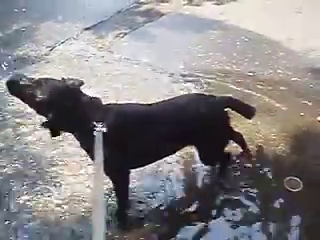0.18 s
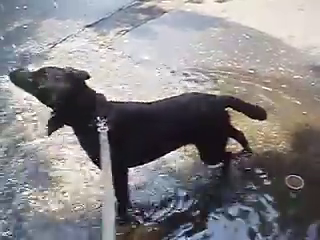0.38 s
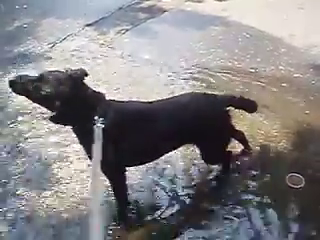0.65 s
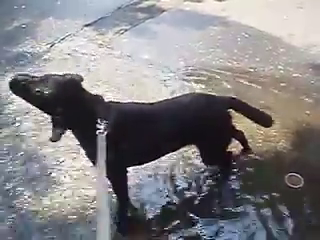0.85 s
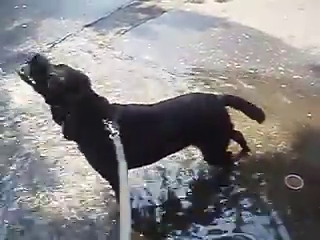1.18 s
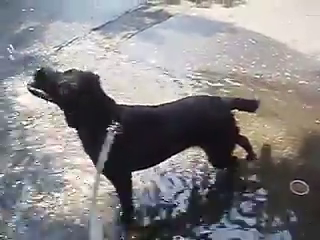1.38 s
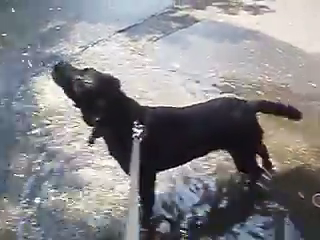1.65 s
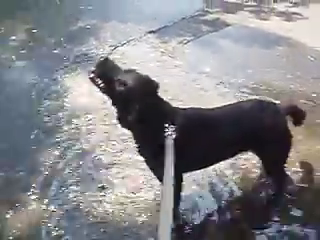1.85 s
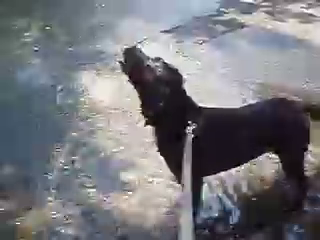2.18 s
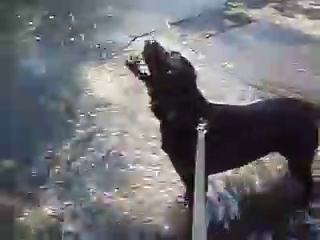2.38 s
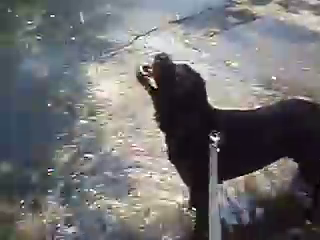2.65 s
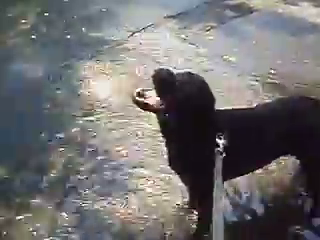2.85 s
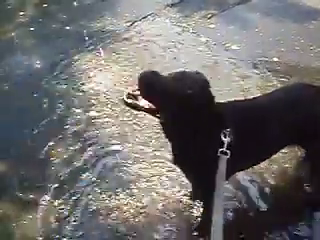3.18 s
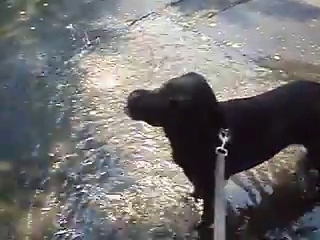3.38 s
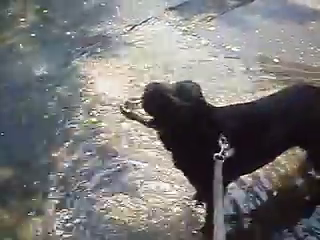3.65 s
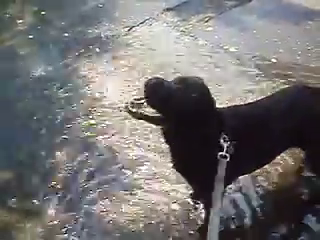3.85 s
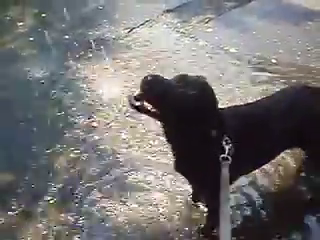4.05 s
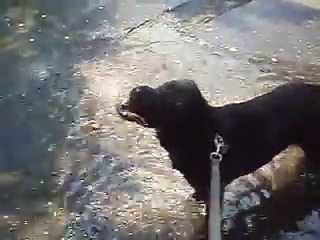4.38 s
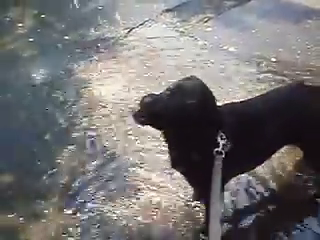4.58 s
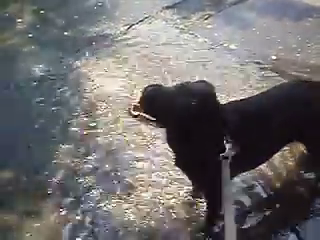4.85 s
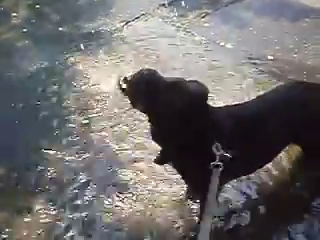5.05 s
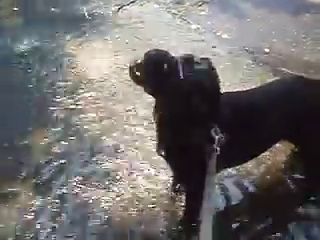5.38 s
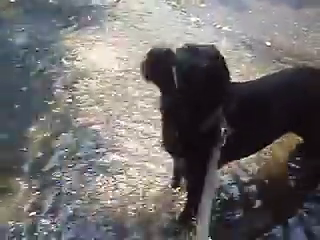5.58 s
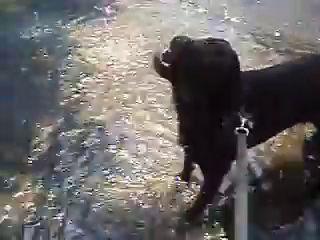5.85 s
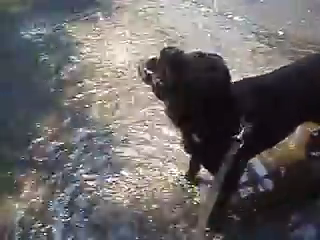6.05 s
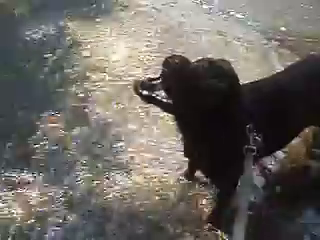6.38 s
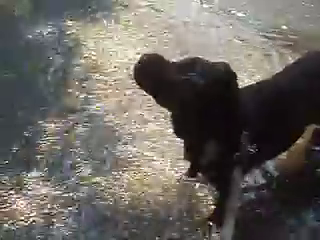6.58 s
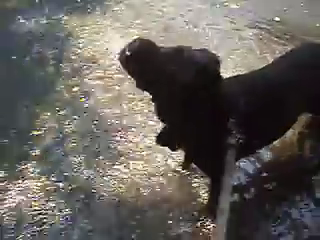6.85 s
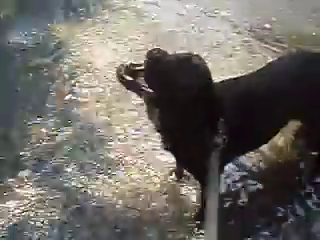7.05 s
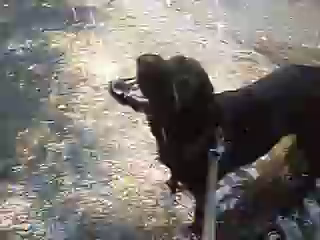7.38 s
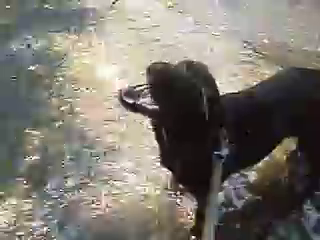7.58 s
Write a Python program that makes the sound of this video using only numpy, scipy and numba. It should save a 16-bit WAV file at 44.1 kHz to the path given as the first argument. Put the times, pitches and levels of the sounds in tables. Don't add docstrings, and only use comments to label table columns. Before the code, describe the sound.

A loud, bright hiss of spraying water fills the whole stretch, made of countless tiny splashes on a puddled pavement outdoors. Nearby drops plink sharply, some lower and rounder, others tick on stone. A low pump throbs underneath with blurred distant traffic. The spray gusts briefly after four seconds. A small camera microphone makes it narrow, dull on top and crunchy with overload.

```python
import sys
import numpy as np
from scipy import signal
from scipy.fft import rfft, irfft
from scipy.io import wavfile
from scipy.ndimage import uniform_filter1d
from numba import njit

SR = 44100
rng = np.random.default_rng(int(sys.argv[2]) if len(sys.argv) > 2 else 0)


def level_to_linear(level):
    exponent = np.asarray(level, float) / 20
    return 10 ** exponent


def persist_wave(psi):
    counts = np.round(np.clip(psi, -1, 1) * 32767).astype(np.int16)
    wavfile.write(sys.argv[1], SR, np.atleast_2d(counts).T)


N = 340452

# time_s, level_db
SPRAY_FLOW = [
    (0.0, -22),
    (0.64, -22.5),
    (1.24, -21),
    (4.0, -22.5),
    (4.28, -18.5),
    (4.86, -22),
    (5.78, -20),
    (5.98, -21.5),
    (7.72, -21.5),
]
# freq_hz, level_db (per Hz)
HISS_COLOUR = [(1000, -25), (1700, -8), (2100, -7.5), (2600, -3.5), (3050, -3.5), (3350, -0.5), (3600, -1),
               (4200, 3), (6000, 0)]
# freq_hz, level_db (per Hz)
PATTER_COLOUR = [(400, -6.5), (650, -6.5), (1000, -2), (1500, -1), (2000, -4.5), (2600, -9), (3500, -30.5)]
# peak_s, peak_db, pitch_hz, loud_part_cycles
NEAR_DROPS = [(0.2286, 0.8, 3450, 4.5), (0.67, -1.5, 3100, 2.1), (0.727, -0.5, 3030, 1.6),
              (1.3383, 0.5, 2750, 3.2), (1.5718, -2, 3190, 2.3), (1.6552, 1, 3030, 2.5),
              (1.7555, 0, 3280, 2.7), (1.8984, 1.5, 3370, 5.0), (2.2186, -0.5, 3080, 2.2),
              (2.4342, -4.5, 2820, 2.2), (2.4828, -7.5, 3510, 5.5), (2.6328, -2, 3040, 4.2),
              (2.9702, 2, 3400, 3.2), (3.1575, 0.5, 3430, 4.1), (3.2598, 0, 3230, 6.5),
              (3.5561, -2.5, 3500, 7.0), (3.79, -1, 2870, 2.7), (4.1397, 2, 3140, 2),
              (4.6667, -10, 3270, 6.4), (5.1663, 0, 3170, 2.6), (5.2042, 0, 3180, 1.9),
              (5.2507, 2.5, 3350, 2.2), (5.264, -1.5, 3220, 5.6), (5.943, 5.2, 3000, 1.7),
              (6.0117, 0.5, 2750, 2.9), (6.5294, 0.5, 2950, 2.9), (6.8639, 0.5, 3230, 4.9),
              (7.2348, -3, 3100, 2.8), (7.2713, 1.5, 3340, 7.2), (7.5009, -6.5, 3500, 4.9)]
# peak_s, peak_db, pitch_hz, loud_part_cycles
LOW_PLINKS = [(0.2041, -13.5, 1185, 7.1), (0.6832, -8.5, 1600, 2.1), (0.936, -15, 1303, 3.5),
              (1.4266, -13, 1500, 2.2), (2.0641, -17, 1610, 2.2), (2.3114, -12.5, 1590, 3.8),
              (2.354, -6, 1130, 4.4), (3.0429, -9, 1475, 1.9), (3.1183, -10, 1820, 3.8),
              (3.3947, -14, 1940, 7.3), (3.6193, -12, 1410, 1.7), (4.4656, -12.5, 1464, 4.6),
              (4.4923, -9, 1330, 1.9), (4.6677, -16, 1730, 6.7), (5.5377, -14, 1620, 2.5),
              (5.7594, -7.5, 1324, 1.5), (6.2225, -8, 1586, 3), (6.461, -10.5, 1260, 2.4),
              (6.8825, -6.5, 1124, 1.5), (7.5266, -10.5, 1820, 4.5), (7.6699, -9, 1900, 3.2)]
# pitch_hz, mean_level_db, load_share (of the load's swing)
PUMP_PARTIALS = [(69.86, -21.5, -0.22), (113.8, -26, 0.26), (172.2, -25.5, 0.16), (217, -25.5, 0.91)]
# time_s, level_db
PUMP_LOAD = [(0, 4.5), (.6, 2), (1.0, -4.5), (1.6, -8), (2.6, -0.5), (3.9, 0.5), (4.4, -6.5), (4.7, 5),
             (6.0, 4), (6.9, 6), (7.3, -1), (7.72, -11)]
# pitch_hz, width_hz, level_db
WHINE_TONES = [(156.0, 7.0, -26), (1191, 3.0, -45), (1950, 4.0, -44)]
# time_s, level_db
TRAFFIC_SWELL = [(0.0, -22), (0.23, -21.5), (0.56, -22.5), (0.73, -22), (1.78, -21), (2.49, -22.5),
                 (2.79, -22), (3.07, -22), (3.46, -22), (3.67, -22.5), (4.43, -21.5), (4.75, -21.5),
                 (5.65, -21), (5.83, -22), (6.26, -22.5), (6.66, -21.5), (6.94, -24), (7.72, -20)]
# freq_hz, level_db (per Hz)
RUMBLE_COLOUR = [(20, -24), (40, -8.5), (70, -3), (120, -3.5), (220, -4), (320, -8.5), (500, -14),
                 (800, -19.5), (1500, -27.5)]
# freq_hz, gain_db
BAND_EDGE = [(10, 1), (3650, -1), (3880, -5.5), (4090, -13), (4300, -23.5), (4500, -35.5), (4650, -62.5),
             (5000, -95)]

PATTER_DB, PATTER_FOLLOWS = -25, 0.68
SPLAT_PER_S, SPLAT_DB, SPLAT_SPREAD_DB = 200, -7, 4.5
STRAY_PER_S, STRAY_DB, STRAY_SPREAD_DB = 18, -8, 2
STRAY_HZ, STRAY_SPREAD_HZ = 3230, 280
STRAY_CYCLES, STRAY_LONGER = 1.9, 0.9
THROB_DB, THROB_PER_S = 4.5, 5.26
RUMBLE_DB = 6.5
CONVERTER_TOP = 0.745
KNEE, KNEE_BEND = 0.64, 0.2
OVERLOAD = 0.7


def spray():
    flow_db = over_time(SPRAY_FLOW)
    patter_db = PATTER_DB + PATTER_FOLLOWS * (flow_db - flow_db.mean()) + 0.58 * drift(1.5)
    gusts_db = 0.44 * drift(2) + 2.3 * drift(32)
    far = level_to_linear(-6) * colour(rng.standard_normal(N) * level_to_linear(gusts_db), HISS_COLOUR)
    grains = level_to_linear(-8) * colour(shower(800, 1800, 4600, 3.2, spread_db=4.5), HISS_COLOUR)
    bright = far + grains + level_to_linear(SPLAT_DB) * splats()
    patter_wash = level_to_linear(-1.5) * colour(rng.standard_normal(N), PATTER_COLOUR)
    patter_drops = level_to_linear(-6.0) * colour(shower(250, 584, 2400, 2.873, spread_db=5.0), PATTER_COLOUR)
    return level_to_linear(flow_db + 9) * bright + level_to_linear(patter_db - 2.23) * (patter_wash + patter_drops)


def splats():
    ticks = shower(SPLAT_PER_S, 3600, 5200, 1.3, spread_db=SPLAT_SPREAD_DB, count=4000)
    return colour(ticks, HISS_COLOUR)


def shower(per_s, low_hz, high_hz, cycles, spread_db, count=30000):
    when, size, pitch, length, climb = rng.random((count, 5)).T
    peak_s = np.cumsum(-np.log(1 - when)) / per_s
    fall = peak_s < N / SR
    hz = low_hz * (high_hz / low_hz) ** pitch
    db = spread_db * np.minimum(-np.log(1 - size), 2.8) + 10 * np.log10(hz / low_hz)
    ring_cycles = cycles * (0.35 + 1.2 * length[fall])
    return rms_one(bubbles(peak_s[fall], db[fall], hz[fall], ring_cycles, 0.069 * climb[fall]))


def near_drops(table, boost_db, rise):
    peak_s, db, hz, cycles = np.transpose(table)
    return bubbles(peak_s, db + boost_db, hz, cycles, np.full(len(peak_s), rise))


def stray_drops(count=400):
    gap, length = rng.exponential(1, (count, 2)).T
    size, pitch = rng.standard_normal((count, 2)).T
    peak_s = np.cumsum(gap) / STRAY_PER_S
    db = STRAY_DB + STRAY_SPREAD_DB * np.clip(size, -3, 1.5)
    hz = STRAY_HZ + STRAY_SPREAD_HZ * pitch + 60 * (length - 1)
    cycles = STRAY_CYCLES + STRAY_LONGER * length
    rows = np.c_[peak_s, db, hz, cycles]
    return near_drops(rows[peak_s < N / SR], 0, 0.066)


def bubbles(peak_s, db, hz, cycles, rise):
    out = np.zeros(N)
    swell = np.clip(0.7 * cycles, 0.5, 12)
    start = np.maximum((peak_s - swell / hz) * SR, 0).astype(np.int64)
    ring(out, start, level_to_linear(db), hz / SR, swell, rise / swell)
    return out


@njit
def ring(out, start, height, step, swell, rise):
    for k in range(len(start)):
        for i in range(min(int(6 * swell[k] / step[k]), len(out) - start[k])):
            turn = i * step[k]
            shape = (turn / swell[k] * np.exp(1 - turn / swell[k])) ** 2
            bent_turn = turn * (1 + rise[k] * (turn - 2 * swell[k]))
            out[start[k] + i] += height[k] * shape * np.sin(2 * np.pi * bent_turn)


def pump():
    out = np.zeros(N)
    load_db = over_time(PUMP_LOAD)
    for hz, db, load_share in PUMP_PARTIALS:
        phase = 2 * np.pi * np.cumsum(hz + 1.7 * drift(5.07)) / SR
        throb_db = -THROB_DB * drift(THROB_PER_S) ** 2 + 1.83 * drift(13.2)
        level_db = db + 3 + load_share * load_db + throb_db
        out += np.sqrt(2) * level_to_linear(level_db) * np.sin(phase)
    return out


def whines():
    out = np.zeros(N)
    for hz, width_hz, db in WHINE_TONES:
        r = np.exp(-np.pi * width_hz / SR)
        poles = [1, -2 * r * np.cos(2 * np.pi * hz / SR), r * r]
        out += level_to_linear(db) * rms_one(signal.lfilter([1, 0, -1], poles, rng.standard_normal(N)))
    return out


def traffic():
    return level_to_linear(over_time(TRAFFIC_SWELL) + RUMBLE_DB) * colour(rng.standard_normal(N), RUMBLE_COLOUR)


def over_time(rows):
    s, db = np.transpose(rows)
    return np.interp(np.arange(N) / SR, s, db)


def drift(rate_hz):
    r = np.exp(-80 * np.pi * rate_hz / SR)
    noise = rng.standard_normal(N // 40 + 2002)
    slow = signal.lfilter([1], [1, -2 * r, r * r], noise)[2000:]
    return np.interp(np.arange(N) / 40, np.arange(len(slow)), rms_one(slow))


def rms_one(x):
    return x / np.sqrt(np.mean(x ** 2) + 1e-20)


def colour(x, spectrum):
    return rms_one(shaped(x, spectrum))


def shaped(x, spectrum):
    hz, db = np.transpose(spectrum)
    grid_hz = np.fft.rfftfreq(N, 1 / SR) + 1
    gain_db = np.interp(np.log(grid_hz), np.log(hz), db, left=-90, right=-120)
    return irfft(rfft(x) * level_to_linear(gain_db), N)


def gain_control(x, window_s, share):
    window = int(window_s * SR)
    power = uniform_filter1d(uniform_filter1d(x ** 2, window), window)
    return x * (np.mean(power) / power) ** (share / 2)


def scene():
    drops = near_drops(NEAR_DROPS, -0.72, 0.057) + near_drops(LOW_PLINKS, -0.65, 0.052) + stray_drops()
    drone = traffic() + pump() + whines()
    return (spray() + drops + drone)[None]


def band_limit(x):
    return signal.sosfilt(signal.butter(12, 15900, fs=SR, output="sos"), x)


def record(dry):
    levelled = gain_control(dry, window_s=0.056, share=0.18)
    saturated = np.clip(levelled, -CONVERTER_TOP, CONVERTER_TOP)
    narrow = shaped(saturated, BAND_EDGE)
    excess = np.maximum(np.abs(narrow) - KNEE, 0)
    bent = narrow - np.sign(narrow) * KNEE_BEND * excess ** 2 / KNEE
    return band_limit(np.clip(bent, -OVERLOAD, OVERLOAD))


dry = scene()
out = record(dry)
persist_wave(out)
```